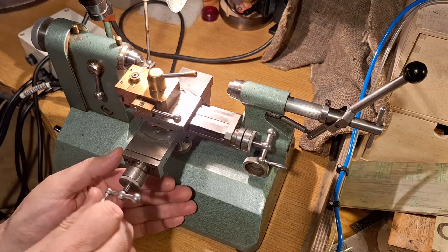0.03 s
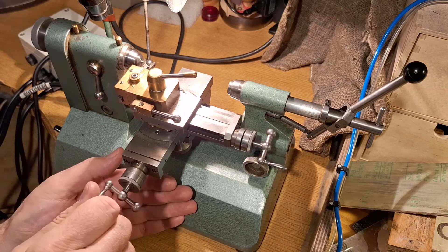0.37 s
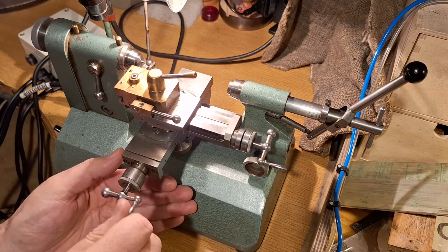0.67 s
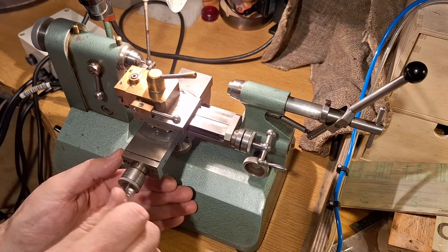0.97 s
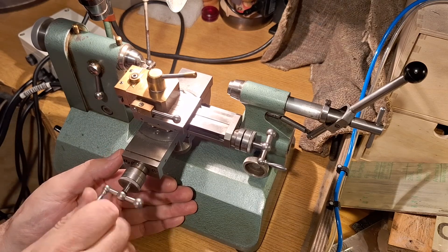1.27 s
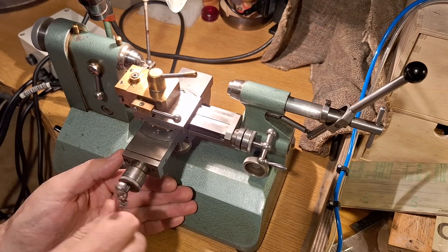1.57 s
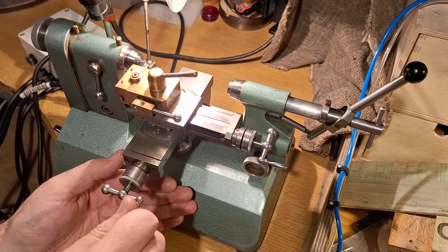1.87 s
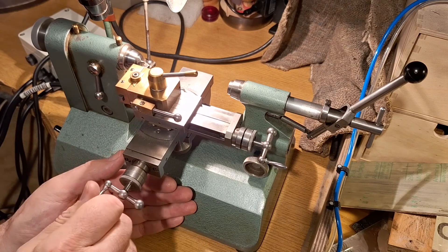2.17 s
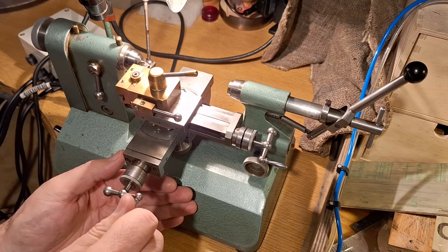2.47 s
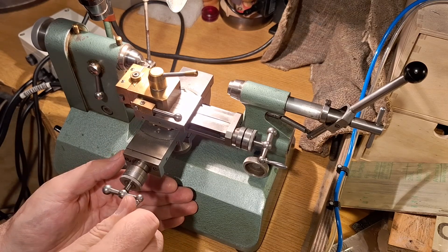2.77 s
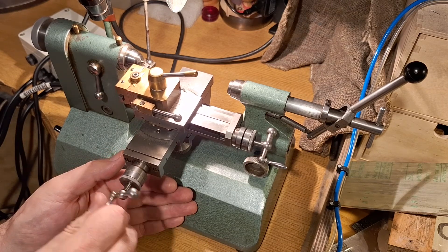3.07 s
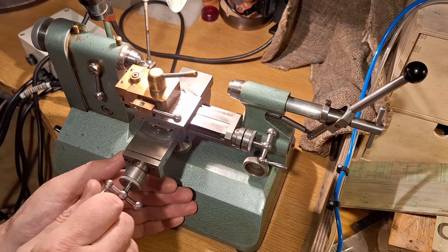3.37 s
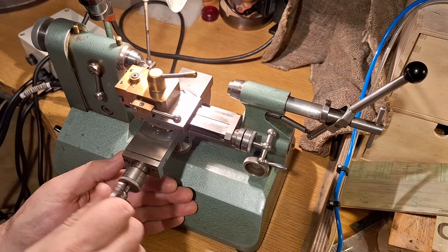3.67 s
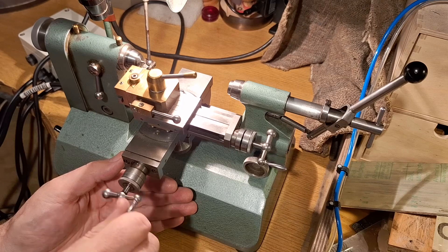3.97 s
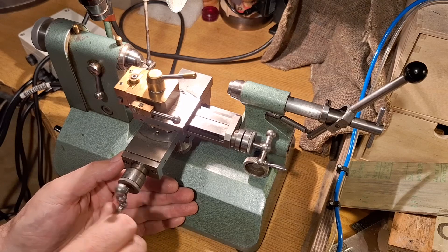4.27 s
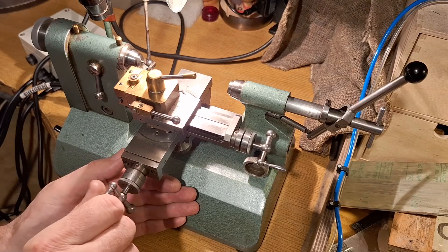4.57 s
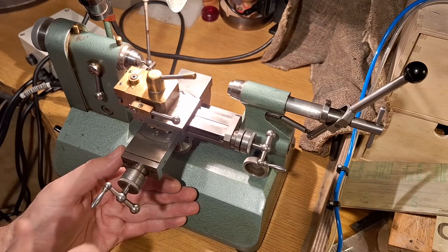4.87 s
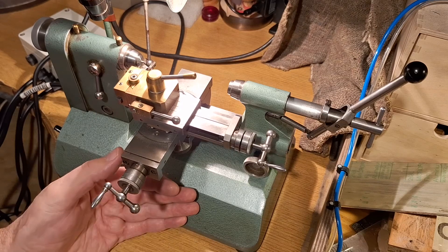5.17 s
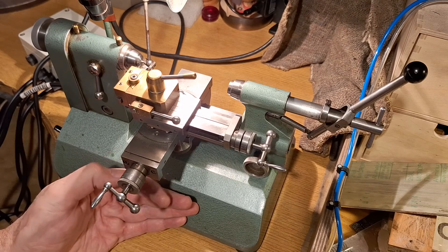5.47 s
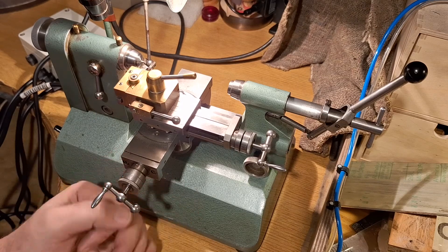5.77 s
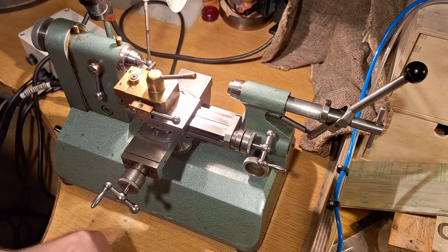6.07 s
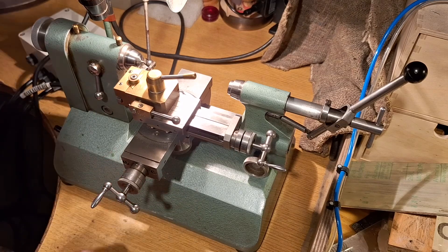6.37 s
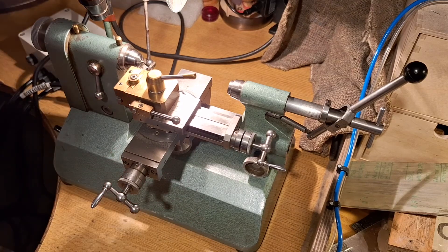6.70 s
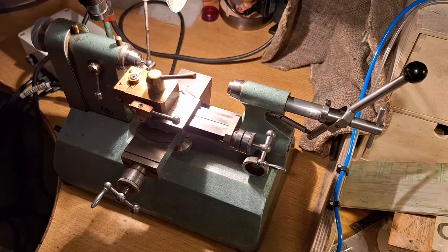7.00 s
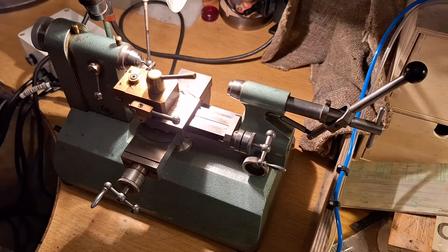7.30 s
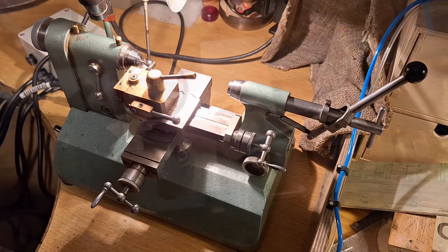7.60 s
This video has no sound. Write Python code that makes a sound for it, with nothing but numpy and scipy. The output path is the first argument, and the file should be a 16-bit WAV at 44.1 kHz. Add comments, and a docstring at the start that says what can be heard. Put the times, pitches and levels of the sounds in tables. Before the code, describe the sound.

A small lathe whirs and hums, switches off and winds down, followed by a brushing hand and soft thumps on a wooden bench.

```python
"""Small lathe on a wooden bench

The belt throbs once a lap, the bearings rattle in the casting and the motor whines and shakes
the bench. Switched off, the lathe coasts to rest and the sticking belt groans. As it stops, a hand
slides over the wood and a few dull knocks set the bench booming in the quiet workshop."""
import sys
import numpy as np
from scipy import signal
from scipy.fft import rfft, irfft, next_fast_len
from scipy.io import wavfile

SR = 44100
rng = np.random.default_rng(int(sys.argv[2]) if len(sys.argv) > 2 else 0)


def bounce(signal):
    """Save signal as a 16-bit WAV file at the path given by the first command-line argument."""
    frames = np.transpose(np.atleast_2d(signal))
    limited = np.clip(frames, -1, 1)
    pcm = np.round(limited * 32767).astype(np.int16)
    wavfile.write(sys.argv[1], SR, pcm)


N = 336924
TIME = np.arange(N) / SR
FREQ = np.maximum(np.arange(N // 2 + 1) * SR / N, 1)
POWER_OFF_S, USUAL_SPEED_HZ = 4.55, 92   # speeds are motor turns per second
LAPS_PER_TURN, START_LAP = .18751, .585   # mean belt ratio; share of a lap already run

# Motor under power, sagging and recovering once: time_s, speed_hz
MOTOR_SPEED = [(0.0, 84.21), (0.75, 91.63), (1.15, 93.85), (1.51, 94.61), (1.77, 93.17), (2.16, 88.41),
               (2.53, 88.13), (2.97, 88.68), (3.34, 87.42), (4.06, 92.72), (4.55, 95.34)]
# Belt pace, gaining and losing a little on the motor: time_s, lap_rate_hz
BELT_RATE = [(0.0, 15.6776), (0.75, 17.2501), (1.15, 17.6821), (1.51, 17.8293), (1.77, 17.5377),
             (2.16, 16.4531), (2.53, 16.4681), (2.97, 16.5888), (3.34, 16.2724), (4.06, 17.4813),
             (4.55, 17.9594)]
# Tones of the drumming belt: lap_harmonic, relative_db
DRUM_TONES = [(23, -14.5), (26, -11.5), (27, -21.5), (28, -4), (29, 3.5), (30, -14), (31, -4.5), (32, -12),
              (33, 0.5), (35, -9.5), (37, -4), (38, -11.5), (39, -12)]
# Resonances of the headstock and belt guard: pitch_hz, width_hz, gain_db
GUARD_MODES = [(431, 20, -11), (492.4, 22, -5.5), (511.5, 16, -10), (568.6, 17, -11), (594.3, 22, -11.5),
               (618, 9.1, -18), (673, 30, -21)]
# Tone colour of the belt rubbing on the pulley: frequency_hz, gain_db
RUB_EQ = [(200, -17.5), (340, -14.5), (420, -2), (500, 3.5), (600, -5.5), (720, -8.5), (850, -8),
          (1200, -16.5)]
# Groans of the sticking belt: start_s, length_s, t60_s, pitch_hz, glide_hz_per_s, level_db
BELT_GROANS = [(5.19, 0.033, 0.3, 660, -600, -45.5), (5.237, .035, 0.13, 505, -200, -34.5),
               (5.293, 0.023, 0.21, 490.6, -58.5, -43), (5.385, 0.023, .07, 486, -58.5, -56)]
# Tone colour of the bearing rattle: frequency_hz, gain_db
RATTLE_EQ = [(35, -15.5), (60, -7.5), (100, 6.5), (190, -14), (400, -7), (640, 5.5), (840, -8), (1150, -2),
             (1600, -1), (3000, 0), (4600, -6), (6500, -10), (9000, -13.5), (15500, -15.5)]
# Ring of the metal casting: pitch_hz, width_hz, boost_db
CASTING_MODES = [(235, 10, 4.8), (1016, 130, 9), (1190, 76, 6.8), (1324, 80, 5.3), (1498, 20, 4.6),
                 (1817, 90, 9), (2206.5, 110, 12.4), (2455, 70, 10), (2570, 60, 5.4), (2850, 150, 11),
                 (3270, 77, 8.8), (3406, 46, 9), (3690, 80, 11), (4065, 120, 6.7), (4284, 94, 11),
                 (4456, 100, 4.9), (4854, 90, 10), (5624, 110, 10), (7140, 130, 10), (7580, 110, 5.2),
                 (7770, 150, 9), (8090, 250, 8.2), (10220, 450, 4.9), (11600, 400, 3.3), (12870, 450, 6)]
# Thin bearing whistles, set against the rattle: speed_multiple, resonance_hz, width_hz, relative_db
BEARING_WHISTLES = [(82.3, 7180, 320, -20.5), (108.5, 10300, 780, -25)]
# Loose metal in the headstock, last heard as it slows: start_s, relative_db
METAL_CLICKS = [(0.0914, -15), (1.0874, -19), (2.3655, -17.5), (2.797, -18.5), (5.0819, -24)]
# Tone colour of metal on metal: frequency_hz, gain_db
CLICK_EQ = [(400, -21.5), (1200, -6), (2200, -2), (2850, 4.5), (4500, -8), (8000, -14.5), (15000, -20.5)]
# Partials of the magnetic whine: speed_multiple, base_level_db
WHINE_TONES = [(5, -43.5), (8, -58.5), (10, -58), (11, -41.5), (12, -47), (13, -50), (14, -58.5),
               (15, -47.5), (16, -55), (17, -56), (20, -47), (26, -51)]
# Resonances of the motor housing: pitch_hz, width_hz, boost_db
HOUSING_MODES = [(978, 18, 3), (1038, 24, 4.5), (1140, 30, -0.5), (1207, 30, 1.5), (1359, 60, 5)]
# Vibration of the rotating parts: speed_multiple, base_level_db
SHAKE_TONES = [(.686, -48.5), (1, -41), (1.125, -48.5), (1.371, -64), (1.5, -53.5), (2, -68), (2.812, -54),
               (3, -63)]
# How readily the bench passes that vibration on: frequency_hz, gain_db
BENCH_EQ = [(20, -32), (45, -7.5), (58, 2), (66, 0), (73, 12), (80, 5), (88, -2), (300, -1.5)]
# Dull rumble of the bench under the machine: frequency_hz, gain_db
RUMBLE_EQ = [(40, -18.5), (56, -2), (110, -2.5), (160, -10), (250, -15.5), (350, -11.5), (480, -28.5),
             (1500, -60.5)]
# Where each band of the lathe sits in stereo: frequency_hz, left_minus_right_db
LATHE_PAN = [(60, 3), (250, 2), (500, 1), (1000, 5.5), (1900, 3), (2800, 1.5), (4200, -1), (5700, 2.5),
             (7400, 3.5), (8800, -1.5), (10200, -4.5), (11300, -6.5), (13000, -2), (15000, -2)]
# Phase offset between the lathe's two sides: frequency_hz, left_lead_rad
LATHE_PHASE = [(90, -0.42), (260, 0.17), (440, 0.23), (500, 0.32), (590, 0.82), (700, 0.4), (1016, 0.44),
               (1190, 1.2), (1324, -0.65), (1500, 1), (1822, 1.23), (2030, 1), (2207, 0.94), (2450, 1.0),
               (2600, 1.5), (2840, 1.08), (3270, 3.5), (3393, 3.5), (3698, 2), (4110, 0.3), (4288, -0.6),
               (4870, 0.4), (5640, 0.86), (7155, 1.5), (7750, -1.8), (8090, -2.2), (10220, -1.5),
               (12870, -5)]
# Hand on wood, a faint touch, a long slide and three brushes: start_s, length_s, level_db
HAND_STROKES = [(5.25, 1.32, -78), (5.488, 0.31, -41), (6.051, 0.05, -65), (6.216, 0.061, -59),
                (6.402, 0.046, -61.5)]
# Tone colour of skin on wood: frequency_hz, gain_db
SLIDE_EQ = [(120, -56), (200, -18), (339, -14.5), (479, -14), (564, -4), (677, -13), (769, -2), (1050, -8),
            (1740, -4), (4580, -5), (7760, -5), (9140, -13), (15500, -14.5)]
# Faint rustles as the hand withdraws: start_s, length_s, level_db
HAND_RUSTLES = [(6.802, 0.73, -82.5), (7.28, .09, -73), (7.51, .06, -80)]
# Airy tone colour of the rustles: frequency_hz, gain_db
RUSTLE_EQ = [(400, -13), (1500, -15), (5000, -6), (9000, 0), (13000, 6), (15500, 1)]
# Knocks on the bench: start_s, contact_s, clatter_t60_s, clatter_db, lowpass_hz, boom_db, boom_lag_s
BENCH_KNOCKS = [(5.074, 0.0091, .2, -38, 3220, -45, .012), (6.136, 0.026, 0.29, -33.5, 14000, -30, .016),
                (6.372, 0.02, 0.14, -39.5, 350, -35, 0.026), (6.452, 0.003, 0.11, -45.5, 1000, -66, 0.0082)]
# Tone colour of a knock's clatter: frequency_hz, gain_db
CLATTER_EQ = [(60, -4), (190, -1), (340, 2), (520, -2.5), (700, -3.5), (920, -11), (1300, -12.5),
              (3500, -14), (6000, -20), (15000, -32)]
# Hollow resonances of the bench: pitch_hz, width_hz, boost_db
HOLLOW_MODES = [(251, 18, 2), (343, 32, 2), (496, 47, 2.5), (920, 87, 8.5)]
# Boom of the struck bench: pitch_hz, relative_db, t60_s
BOOM_MODES = [(64.6, 0, 0.43), (133.4, -16.5, 0.62), (168, -16, 0.37), (258, -5, 0.2), (318, -32.5, 1.2),
              (356, -15, 0.18), (620, -23, 0.23)]
# Tone colour of the arm shifting on the bench: frequency_hz, gain_db
SHUFFLE_EQ = [(100, -8), (150, 1), (220, -20), (330, 1), (480, -3.5), (700, -8), (1500, -21)]
# Room tone of the workshop: frequency_hz, gain_db
ROOM_EQ = [(30, -15.5), (60, 3.5), (80, -3), (100, 3.5), (120, -8), (140, -7), (165, -16.5), (300, -17.5),
           (400, -26), (1000, -32.5), (4500, -38), (6000, -32), (7500, -29), (10000, -35), (15500, -29.5)]
# How alike left and right sound in the room: frequency_hz, correlation
STEREO_LIKENESS = [(60, 0.85), (300, 0.85), (640, 0.72), (1000, 0.67), (1400, 0.66), (2400, 0.58),
                   (3400, 0.51), (4400, 0.67), (5600, 0.23), (8000, 0.19), (15000, .3)]


def scene():
    """The lathe up front, then hand, arm and knocks on the bench, over room tone."""
    return lathe() + hand() + knocks() + arm_shuffle() + workshop()


def lathe(bearing_db=-29.5, rumble_db=-45):
    """All running parts follow one shaft and grow louder with its speed; each band has its own pan."""
    speed = motor_speed()
    turns = np.cumsum(speed) / SR
    pace = speed / USUAL_SPEED_HZ
    rattle = from_db(bearing_db) * pace ** 1.9 * (bearings(turns) + whistles(turns, speed))
    rumble = from_db(rumble_db) * pace * colour(noise(), RUMBLE_EQ)
    sound = belt(speed) + belt_groans() + rattle + clicks() + rumble
    sound = sound + pace ** 1.5 * motor_whine(turns, speed) + shake(turns, speed)
    right_lag = np.exp(-1j * at_hz(LATHE_PHASE, FREQ) * [[0], [1]])
    placed = pan(rfft(sound) * right_lag, at_hz(LATHE_PAN, FREQ))
    return (speed > 0) * irfft(placed, N)


def motor_speed(coast_hz_per_s=56, grip_hz_per_s=162, grip_s=5.055):
    """Turns per second: driven, then coasting, then gripped by friction until the shaft stands."""
    braking = np.where(TIME < grip_s, coast_hz_per_s, grip_hz_per_s) * (TIME > POWER_OFF_S)
    return np.maximum(over_time(MOTOR_SPEED) - np.cumsum(braking) / SR, 0)


def belt(speed, settle_s=5.05, settle_fade_s=.09, settle_db=-5):
    """The belt drums and rubs over the pulley, then stops flapping and goes quieter as it runs down."""
    pace = speed / USUAL_SPEED_HZ
    coasted_s = np.maximum(TIME - POWER_OFF_S, 0)
    lap_hz = over_time(BELT_RATE) * speed / over_time(MOTOR_SPEED)
    lap_phase = 2 * np.pi * (np.cumsum(lap_hz) / SR + START_LAP)
    drumming = pace ** .81 * belt_drum(lap_phase, coasted_s)
    rubbing = pace ** 1.3 * belt_rub(lap_phase, coasted_s)
    settled = np.clip((TIME - settle_s) / settle_fade_s, 0, 1)
    return (drumming + rubbing) * from_db(settle_db * settled)


def belt_drum(lap_phase, coasted_s, level_db=-28.5, throb=.14, fade_s=.34, slip_rad=.15, main_tone=29):
    """Lap harmonics drum on the guard, throb once a lap and fade when the power goes."""
    slip = slip_rad * drift(2.9)
    tones = 0
    for harmonic, db in DRUM_TONES:
        # The belt flexes: the outer tones wander most in phase, which rounds each throb.
        flex = min(.08 * (harmonic - main_tone) ** 2, np.pi) * drift(.5)
        tones = tones + from_db(db) * np.cos(harmonic * lap_phase + slip + flex)
    drumming = belt_guard(tones) * (1 + throb * np.cos(lap_phase))
    drumming = drumming / drumming[TIME < POWER_OFF_S].std()
    return from_db(level_db) * np.exp(-coasted_s / fade_s) * drumming


def belt_rub(lap_phase, coasted_s, level_db=-37.5, slack_boost_db=10, throb=.3, slacken_s=.29):
    """Friction on the pulley pulses once a lap, turning louder and smoother as the belt slackens."""
    tension = np.exp(-coasted_s / slacken_s)
    gain = from_db(level_db + slack_boost_db * (1 - tension ** 2))
    friction = colour(belt_guard(noise()), RUB_EQ)
    return gain * friction * (1 + throb * tension * np.cos(lap_phase))


def belt_guard(x):
    """The headstock and belt guard ring as a bank of parallel resonators."""
    response = sum(from_db(db) / (1 + 2j * (FREQ - hz) / width) for hz, width, db in GUARD_MODES)
    return irfft(rfft(x) * response, N)


def belt_groans(waver_rad=.4):
    """Just before it stops, the sticking belt sings in short, sagging bursts."""
    out = 0
    for start, length, t60, hz, glide, db in BELT_GROANS:
        phase = 2 * np.pi * np.cumsum(hz + glide * (TIME - start)) / SR
        envelope = from_db(db) * swell(start, length, rise_share=.75, t60_s=t60)
        out = out + envelope * np.sin(phase + waver_rad * drift(20))
    return np.sqrt(2) * out


def bearings(turns, ticks_per_s=700, tick_mix=.62, tick_spread_db=2):
    """Rolling hiss and unequal ticks, pulsing with the shaft and the belt's pull, ring the casting."""
    sizes = from_db(tick_spread_db * np.minimum(rng.exponential(1, N), 3))
    ticks = sizes * (rng.random(N) < ticks_per_s / SR) * rng.choice([-1, 1], (2, N))
    rolling = rng.standard_normal((2, N)) + tick_mix * ticks / ticks.std()
    angle = 2 * np.pi * turns
    shaft_pulse = .04 * np.cos(angle) + .065 * np.cos(4 * angle)
    belt_pulse = .07 * np.cos(LAPS_PER_TURN * angle + 2 * np.pi * START_LAP)
    rattle = rolling * (1 + shaft_pulse + belt_pulse) * chatter()
    return colour(spread(rattle), RATTLE_EQ, CASTING_MODES)


def chatter(jolts_per_s=110, t60_s=.049, strength=.61):
    """Play in the bearings: each random jolt kicks the rattle's level up and dies away."""
    jolts = rng.random(N) < jolts_per_s / SR
    energy_decay = from_db(-60 / (t60_s * SR)) ** 2
    energy = signal.lfilter([1], [1, -energy_decay], jolts + 1e-18)
    return np.sqrt(1 + strength * energy)


def whistles(turns, speed, blur_rad=3.5):
    """Each bearing whistle swells when the speed carries it onto a resonance."""
    out = 0
    for multiple, hz, width, db in BEARING_WHISTLES:
        gain = from_db(db) / (1 + (2 * (multiple * speed - hz) / width) ** 2)
        out = out + gain * np.sin(2 * np.pi * multiple * turns + blur_rad * drift(40))
    return np.sqrt(2) * out


def clicks(level_db=-11.5, contact_s=.001, rise_share=.5, t60_s=.025):
    """Brief metal-on-metal contacts ring the casting."""
    envelope = sum(from_db(level_db + db) * swell(start, contact_s, rise_share, t60_s)
                   for start, db in METAL_CLICKS)
    return envelope * colour(noise(), CLICK_EQ, CASTING_MODES)


def motor_whine(turns, speed, waver_db=1.6, belt_pull_rad=.5, cut_s=4.525, fade_s=.02):
    """Magnetic tones ride the speed, swell on the housing's resonances and die with the current."""
    tug = belt_pull_rad * np.sin(2 * np.pi * LAPS_PER_TURN * turns)
    tones = 0
    for multiple, db in WHINE_TONES:
        gain = from_db(db + boost_db(HOUSING_MODES, multiple * speed) + waver_db * drift(15))
        tones = tones + gain * np.sin(2 * np.pi * multiple * turns + tug + rng.uniform(0, 2 * np.pi))
    current = np.clip(1 - (TIME - cut_s) / fade_s, 0, 1)
    return np.sqrt(2) * tones * current


def shake(turns, speed, waver_db=1.5, wander_rad=.45):
    """Unbalance shakes the bench, which booms as the slowing motor passes its resonance."""
    out = 0
    for multiple, db in SHAKE_TONES:
        gain = from_db(db + at_hz(BENCH_EQ, multiple * speed) + waver_db * drift(4.9))
        out = out + gain * np.sin(2 * np.pi * multiple * turns + wander_rad * drift(1.7))
    return np.sqrt(2) * out * speed / speed.max()


def hand(grain_db=.4, rustle_pan_db=-14):
    """Skin slides on wood with a fine grain; light rustling follows on the right."""
    strokes = sum(from_db(db) * swell(start, length, rise_share=.63, t60_s=.2, curve=1.23)
                  for start, length, db in HAND_STROKES)
    rustles = sum(from_db(db) * swell(start, length, rise_share=.34, t60_s=.55)
                  for start, length, db in HAND_RUSTLES)
    slide = strokes * from_db(grain_db * drift(60)) * colour(noise(), SLIDE_EQ)
    return slide + pan(rustles * colour(noise(), RUSTLE_EQ), rustle_pan_db)


def knocks(boom_rise_s=.0043, pan_db=3.5):
    """Each knock clatters on contact, then the heavy bench swings and rings out."""
    clatter = colour(noise(), CLATTER_EQ, HOLLOW_MODES)
    out = 0
    for start, contact_s, clatter_t60, clatter_db, lowpass_hz, boom_db, boom_lag_s in BENCH_KNOCKS:
        envelope = swell(start, contact_s, rise_share=.5, t60_s=clatter_t60)
        lowpass = signal.butter(4, lowpass_hz, fs=SR, output="sos")
        out = out + from_db(clatter_db) * envelope * rms_one(signal.sosfilt(lowpass, clatter))
        age = np.maximum(TIME - start - boom_lag_s, 0)
        attack = np.minimum(age / boom_rise_s, 1)
        for hz, db, t60 in BOOM_MODES:
            out = out + from_db(boom_db + db - 60 * age / t60) * attack * np.sin(2 * np.pi * hz * age)
    return pan(out, pan_db)


def arm_shuffle(level_db=-71.5, waver_db=2.5):
    """The arm shifts on the bench with a faint, dull rub."""
    envelope = swell(start_s=5.3, length_s=1.22, rise_share=.13, t60_s=.8)
    return envelope * from_db(level_db + waver_db * drift(8)) * colour(noise(), SHUFFLE_EQ)


def workshop(room_db=-65, hum_db=-68.5, mains_hz=100):
    """A bed of low room tone and faint mains hum."""
    hum = from_db(hum_db) * np.sqrt(2) * np.sin(2 * np.pi * mains_hz * TIME)
    return from_db(room_db) * colour(noise(), ROOM_EQ) + hum


def swell(start_s, length_s, rise_share, t60_s, curve=1):
    """Envelope: rise over a share of the length, hold to its end, then die away."""
    age = np.maximum(TIME - start_s, 0)
    attack = np.minimum(age / (rise_share * length_s), 1) ** curve
    return attack * from_db(-60 * np.maximum(age - length_s, 0) / t60_s)


def drift(rate_hz, step=20):
    """Smooth random modulation with rms 1, rolling off above the given rate."""
    count = next_fast_len(N // step + 2, real=True)
    hz = np.arange(count // 2 + 1) * SR / step / count
    slow = irfft(rfft(rng.standard_normal(count)) / (1 + (hz / rate_hz) ** 2), count)
    return rms_one(np.interp(np.arange(N) / step, np.arange(count), slow))


def colour(x, eq, modes=()):
    """Apply a broad EQ with resonances that ring after each impulse (minimum phase); rms 1."""
    gain = from_db(at_hz(eq, FREQ) + boost_db(modes, FREQ))
    cepstrum = irfft(np.log(gain), N)
    response = np.exp(rfft(2 * cepstrum * (np.arange(N) < N // 2)))
    return rms_one(irfft(rfft(x) * response, N))


def boost_db(modes, hz):
    """Decibels that a body's resonances add at a frequency."""
    return sum(db / (1 + (2 * (hz - centre) / width) ** 2) for centre, width, db in modes)


def noise():
    """White noise with the room's stereo width."""
    return spread(rng.standard_normal((2, N)))


def spread(pair):
    """Turn two unrelated signals into left and right, alike in the bass and diffuse in the treble."""
    mid, side = rfft(pair)
    alike = at_hz(STEREO_LIKENESS, FREQ)
    return irfft(np.sqrt(1 + alike) * mid + np.sqrt(1 - alike) * side * [[1], [-1]], N)


def pan(x, db):
    """Place a sound by its left minus right level."""
    return x * from_db(np.array([[.5], [-.5]]) * db)


def at_hz(points, hz):
    """Read a curve on a log-frequency axis."""
    frequencies, values = np.transpose(points)
    return np.interp(np.log(np.maximum(hz, 1)), np.log(frequencies), values)


def over_time(points):
    """Read an automation curve at every sample."""
    return np.interp(TIME, *np.transpose(points))


def rms_one(x):
    """Scale so that the mono mix has rms 1."""
    return x / np.sqrt(np.mean(np.atleast_2d(x).mean(axis=0) ** 2) + 1e-20)


def from_db(db):
    """Decibels to gain."""
    return 10 ** (np.asarray(db) / 20)


def record(dry, low_cut_hz=43, high_cut_hz=15550):
    """The microphone drops the deep bass; the top is cut steeply."""
    low_cut = signal.butter(4, low_cut_hz, "high", fs=SR, output="sos")
    high_cut = signal.ellip(12, .2, 80, high_cut_hz, fs=SR, output="sos")
    return signal.sosfilt(high_cut, signal.sosfilt(low_cut, dry))


dry = scene()
out = record(dry)
bounce(out)
```